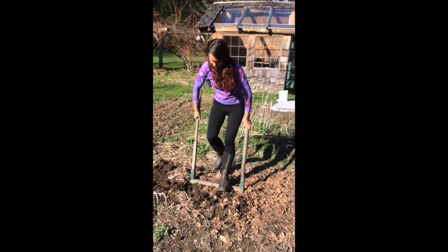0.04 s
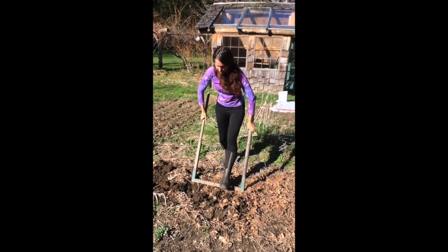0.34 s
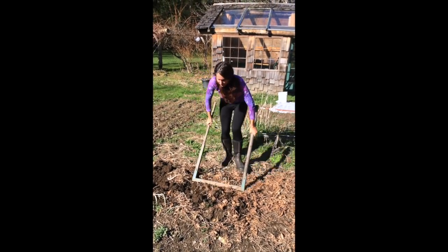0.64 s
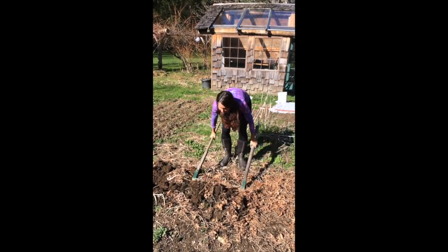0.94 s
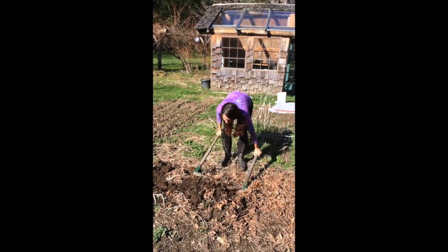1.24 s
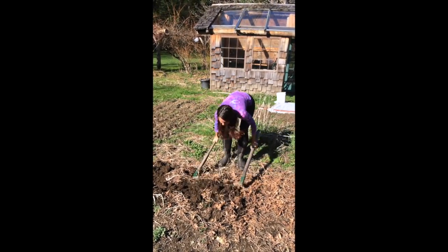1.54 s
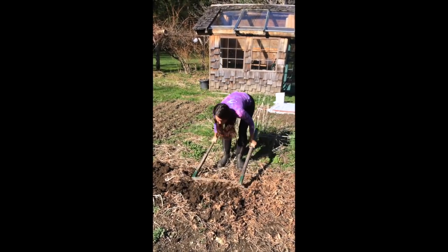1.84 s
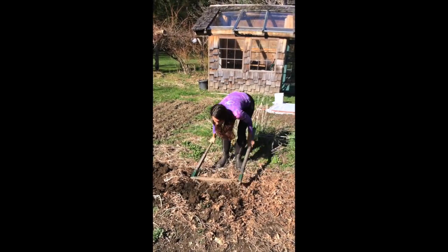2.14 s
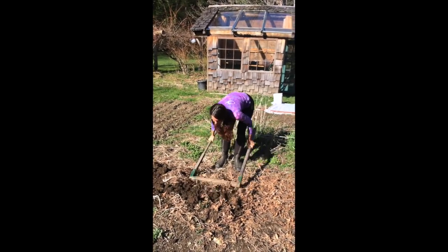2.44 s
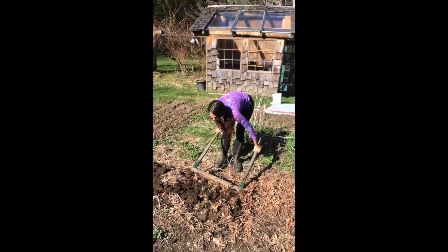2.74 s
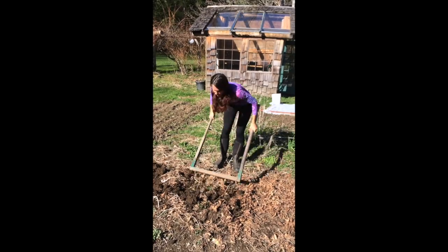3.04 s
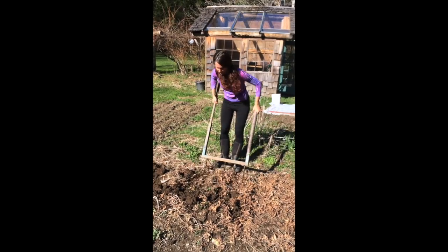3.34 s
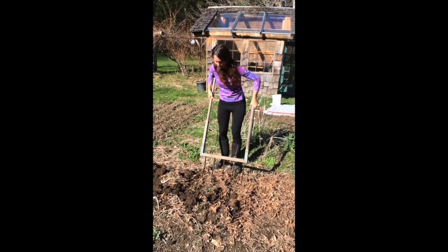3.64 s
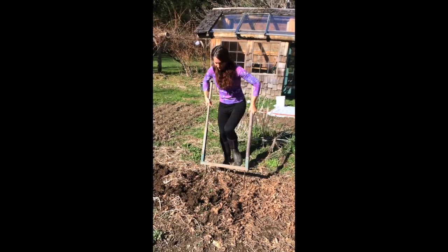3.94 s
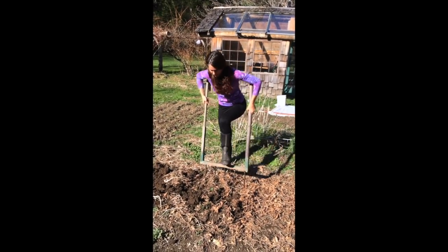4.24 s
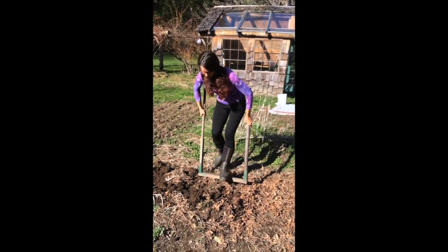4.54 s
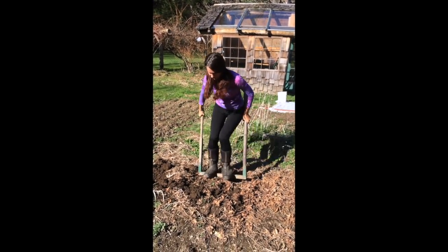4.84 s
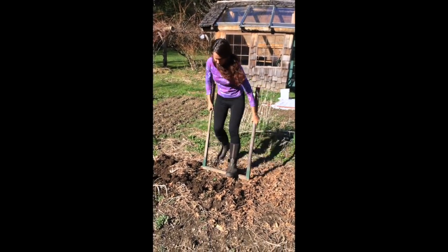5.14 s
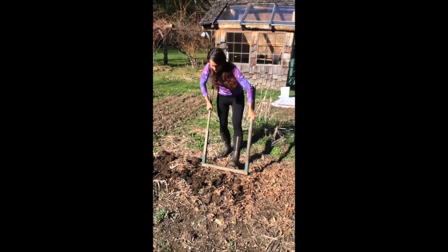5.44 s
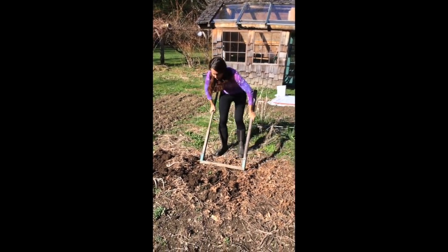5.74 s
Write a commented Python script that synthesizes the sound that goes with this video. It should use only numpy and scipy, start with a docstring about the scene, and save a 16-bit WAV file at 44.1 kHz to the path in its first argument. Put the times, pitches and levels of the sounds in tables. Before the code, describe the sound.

A garden fork levers through soil and dry straw with crunching, dull thuds and wooden knocks, then boots stamp it into gritty ground.

```python
"""A broadfork (a wide digging fork with two handles) loosens soil under straw, outdoors.
First it is levered through the ground: clods break with dull thuds, dry straw crunches and snaps,
and the wooden handles knock in their sockets. Near 3 s the frame clacks and the tines (steel prongs)
slide out with a faint squeak. The fork is set down, and from 4.4 s boots land on the crossbar and
the tines scrape and ring as they sink into gritty ground. Last, the straw crunches again."""
import sys
import numpy as np
from scipy import signal
from scipy.fft import rfft, irfft
from scipy.io import wavfile
from scipy.ndimage import uniform_filter1d

SR = 44100
rng = np.random.default_rng(int(sys.argv[2]) if len(sys.argv) > 2 else 0)


def output_pcm(signal):
    """Save a mono or channel-first signal as 16-bit PCM at the path in sys.argv[1].

    Samples are clipped to [-1, 1] before scaling.
    """
    pcm = np.clip(np.atleast_2d(signal).T, -1, 1) * 32767
    wavfile.write(sys.argv[1], SR, np.round(pcm).astype(np.int16))


N = 260190
TIME = np.arange(N) / SR

# crumbs that keep trickling, most while the fork is levered: t/s, level/dB
TRICKLE_LEVELS = [(0, -53.5), (0.15, -64.5), (0.3, -59.5), (0.42, -53), (1.0, -53), (1.17, -59.5),
                  (1.6, -52.5), (2.86, -52.5), (2.98, -69), (3.6, -59.5), (4.25, -76), (4.65, -63),
                  (4.8, -69.5), (5.08, -57), (5.3, -61), (5.9, -49)]
# the tone of thin straw: f/Hz, level/dB
STRAW_SPECTRUM = [(700, -38), (1600, -20.5), (2200, -11), (3300, -6.5), (5000, -3.5), (7000, 1), (12000, 1),
                  (16000, 2)]
# clods and roots giving way underground: t/s, level/dB, f/Hz
CLOD_BREAKS = [(0.088, -29.5, 121), (0.215, -30.5, 95), (0.38, -23.5, 250), (0.393, -16, 170),
               (0.469, -25.5, 129), (0.583, -24.5, 100), (0.714, -31, 114), (0.817, -22.5, 126),
               (1.221, -33.5, 108), (1.346, -27.5, 184), (1.36, -24.5, 150), (1.394, -12.5, 148),
               (1.411, -22.5, 163), (1.513, -23.5, 157), (1.548, -25.5, 102), (1.66, -9, 196),
               (1.861, -15, 208), (2.021, -22, 118), (2.053, -13, 192), (2.08, -11, 158),
               (2.091, -12.5, 157), (2.494, -21, 108), (3.607, -42, 106), (3.845, -36.5, 101),
               (4.047, -37, 89), (5.374, -24, 187)]


def amp(db):
    """Turns decibels into a factor to multiply a sound by."""
    return 10 ** (np.asarray(db) / 20)


def unit(x):
    """Scales a signal to an average size (rms) of 1."""
    return x / np.sqrt(np.mean(x ** 2) + 1e-20)


def add(mix, s, sound):
    """Mixes a sound in at s seconds."""
    part = mix[max(round(s * SR), 0):][:len(sound)]
    part += sound[:len(part)]


def colour(x, spectrum):
    """Shapes the tone of a sound by rows of f/Hz, level/dB; the result has rms 1."""
    hz, db = np.transpose(spectrum)
    f = np.fft.rfftfreq(len(x), 1 / SR)
    gain = amp(np.interp(np.log(f + 1), np.log(hz), db))
    return unit(irfft(rfft(x) * gain, len(x)))


def wander(first, second):
    """A slow random wobble: noise smoothed twice, over these numbers of samples."""
    return unit(uniform_filter1d(uniform_filter1d(rng.standard_normal(N), first), second))


def swell_db(s, length, rise_db_per_s, fall_db_per_s):
    """A level that rises to 0 dB at time s, stays for length seconds, then falls."""
    return -rise_db_per_s * np.maximum(s - TIME, 0) - fall_db_per_s * np.maximum(TIME - s - length, 0)


def resonances(modes, f, reach=0.81):
    """How a body answers at frequencies f; each mode (natural tone) sounds only near its own pitch."""
    return sum(amp(db) / (1 + 1j * (f - hz ** 2 / f) / width) / (1 + 1j * (f / hz - hz / f) / reach)
               for hz, width, db in modes)


def fractures(per_s, spread_db):
    """Tiny breaks: clicks at random times and of random sizes."""
    size = amp(spread_db * np.minimum(rng.exponential(1, N), 4))
    return size * rng.choice([-1, 1], N) * (rng.random(N) < per_s / SR)


def grains(per_s, spread_db, cycles, count=24):
    """Each tiny break makes one small fibre ring briefly."""
    t, out = np.arange(256) / SR, np.zeros(N)
    for hz in np.linspace(900, 15500, count):
        fibre = np.sin(2 * np.pi * hz * t) * np.exp(-t * hz / cycles)
        out += signal.oaconvolve(fractures(per_s / count, spread_db), unit(fibre))[:N]
    return unit(out)


def patchy(x, depth_db):
    """Fibres of different sizes break in turn, so small patches of time and pitch stand out."""
    spectra = signal.stft(x, nperseg=256, noverlap=192)[2]
    patches = rng.standard_normal(spectra.shape)
    for axis, size in ((0, 3), (0, 3), (1, 6), (1, 6)):  # smooth along pitch, then time
        patches = uniform_filter1d(patches, size, axis)
    spectra *= amp(depth_db * unit(patches))
    return unit(signal.istft(spectra, nperseg=256, noverlap=192)[1][:N])


def pressure(rest_db=-69.5, press_s=0.062, relax_s=0.075):
    """Strength of the fine and the coarse grains: every crush adds its power to the trickle."""
    # wads crushed by boot or fork: t/s, hold/s, level/dB, coarse grains compared with fine/dB
    crushes = [(0.376, 0.041, -35.5, -13), (0.53, 0.1, -37.5, -37), (0.836, 0.038, -25.5, -18),
               (0.955, 0.032, -43.5, -30), (1.288, .04, -38, -16.5), (1.495, 0.045, -28.5, -12),
               (1.723, 0.021, -41, -6), (1.894, 0.0088, -48.5, 6.5), (2.048, 0.0093, -43.5, 3.5),
               (2.19, 0.041, -46.5, 4), (2.35, 0.0064, -46.5, -1), (2.399, 0.0035, -40, 2.5),
               (2.538, 0.01, -45.5, 3.5), (2.745, 0.028, -35, -6), (3.26, 0.15, -27, -32),
               (3.383, 0.068, -23.5, -25), (3.86, 0.043, -46.5, -7.5), (3.95, 0.0083, -53.5, 4),
               (4.876, .02, -46, 0.5), (5.12, 0.01, -47.5, 2), (5.366, 0.0045, -27, -12),
               (5.564, 0.021, -20.5, -16), (5.592, 0.015, -21.5, -7.5), (5.637, .007, -25, -9.5),
               (5.769, 0.0092, -34.5, -7), (5.835, 0.022, -37, -12.5)]
    fine = amp(np.interp(TIME, *np.transpose(TRICKLE_LEVELS))) ** 2
    coarse = fine * amp(-0.5) ** 2
    for s, hold, db, coarse_db in crushes:
        depth_db = max(db - rest_db, 10)
        crush_db = db + swell_db(s, hold, depth_db / press_s, depth_db / relax_s)
        power = amp(np.maximum(crush_db, -200)) ** 2
        fine += power
        coarse += power * amp(coarse_db) ** 2
    return np.sqrt(fine), np.sqrt(coarse)


def crunch(clump_db=1.2):
    """Fine straw and coarse crumbs break in clumps of tiny clicks over a soft rustle."""
    fine, coarse = pressure()
    clumps = amp(clump_db * wander(160, 90))
    straw = grains(per_s=5000, spread_db=2.5, cycles=0.96)
    straw += 0.87 * unit(fractures(per_s=3200, spread_db=1.5))
    straw = patchy(straw + rng.standard_normal(N), depth_db=2.6)
    crumbs = grains(per_s=6000, spread_db=3.5, cycles=0.28)
    crumbs = patchy(crumbs + rng.standard_normal(N), depth_db=4.5)
    straw += 0.33 * grains(per_s=130, spread_db=3, cycles=7)  # stiffer fibres, each with its own pitch
    # the tone of crumbs and stalks: f/Hz, level/dB
    crumb_spectrum = [(200, -25), (500, -2), (1100, 1.5), (1900, 5.5), (3200, 2.5), (5000, 4.5), (9000, 3),
                      (16000, -7.5)]
    return clumps * (fine * colour(straw, STRAW_SPECTRUM) + coarse * colour(crumbs, crumb_spectrum))


def crackles(level_db=-4):
    """Among the trickling crumbs, single dry fibres tick."""
    ticks = grains(per_s=45, spread_db=2.8, cycles=9) + unit(fractures(per_s=18, spread_db=2.8))
    trickle_db = np.interp(TIME, *np.transpose(TRICKLE_LEVELS))
    return amp(level_db + trickle_db) * colour(ticks, STRAW_SPECTRUM)


def soil(rise_cycles=0.32, fall_cycles=0.64):
    """Each clod gives way with a thud of one or two cycles; loose earth rumbles around it."""
    out, t = np.zeros(N), np.arange(-3000, 3000) / SR
    for s, db, hz in CLOD_BREAKS:
        cycles = t * hz
        swell = np.exp(-np.abs(cycles / np.where(t < 0, rise_cycles, fall_cycles)) ** 1.31)
        wave = np.sin(2 * np.pi * cycles + rng.uniform(-0.66, 1.0))
        add(out, s + t[0], amp(db) * swell * wave)
    low_cut = signal.butter(2, 50, "high", fs=SR, output="sos")
    return signal.sosfilt(low_cut, out + loose_earth())


def loose_earth(lurch_db=4, slump_db=-15, slump_db_per_s=600):
    """Earth rumbles in lurches through each pull, and slumps briefly around each breaking clod."""
    # pulls on the handles that lift the earth: t/s, length/s, level/dB
    heaves = [(0.465, 0.45, -42), (1.293, 0.4, -41.5), (1.982, 0.078, -36.5), (2.255, 0.54, -55)]
    rumble = colour(rng.standard_normal(N),
                    [(30, -34), (75, -1), (130, -6.5), (200, -14), (320, -32.5), (700, -35.5), (2000, -82)])
    lurch = lurch_db * wander(1000, 700)
    pulls = [db + lurch + swell_db(s, length, rise_db_per_s=300, fall_db_per_s=218)
             for s, length, db in heaves]
    slumps = [db + slump_db - slump_db_per_s * np.abs(TIME - s) for s, db, _ in CLOD_BREAKS]
    return amp(np.max(pulls + slumps, axis=0)) * rumble


def sharp_cracks(tail_db=-22, tail_s=0.021, skirt_db=-22, rise_s=0.00096, ripple_db=4, size=4096):
    """Short bursts of noise: stalks snapping, grit striking the steel, the frame's tick as it clacks."""
    # short sharp cracks: t/s, level/dB, f/Hz, width/octaves, decay/s
    cracks = [(0.382, -21.5, 9050, 0.59, 0.0063), (.405, -19, 10200, 0.39, 0.0029),
              (0.585, -18, 8000, 0.74, 0.0031), (0.784, -30, 5920, 0.044, 0.008),
              (0.819, -19.5, 11100, 0.35, .0015), (0.9304, -15.5, 6050, 0.32, 0.0029),
              (0.929, -26.5, 1620, 0.44, 0.0035), (1.132, -34.5, 9450, 0.91, .0015),
              (1.494, -24, 3100, 1.34, 0.0067), (2.177, -31, 4530, 0.048, 0.0039),
              (2.225, -33.5, 5300, 0.15, 0.005), (2.346, -32, 8000, 3.5, 0.0064),
              (2.526, -27, 4100, 0.21, 0.0024), (2.735, -18.5, 11340, 0.067, 0.0025),
              (2.9084, -19, 6070, 0.48, 0.0029), (3.264, -21.5, 9300, 0.46, 0.014),
              (3.397, -17, 10100, 1.33, 0.0017), (3.541, -38.5, 11500, 0.32, 0.0015),
              (4.435, -19.5, 2930, 0.34, 0.0046), (4.892, -30, 8540, 0.37, 0.0036),
              (4.952, -42.5, 8200, 0.3, 0.0035), (5.365, -16, 8700, 0.62, 0.0059),
              (5.14, -26, 1900, 0.19, 0.01), (5.692, -17.5, 6600, 1.13, 0.0071),
              (5.761, -26.5, 11200, 0.78, 0.019), (5.831, -19.5, 10000, 0.59, 0.0051)]
    out, t = np.zeros(N), (np.arange(size) - size // 8) / SR
    f, after = np.fft.rfftfreq(size, 1 / SR) + 1, np.maximum(t, 0)
    for s, db, hz, octaves, decay in cracks:
        shape = np.exp(-0.5 * (np.log2(f / hz) / octaves) ** 2) + amp(skirt_db) / (f / hz + hz / f)
        ripple = unit(uniform_filter1d(rng.standard_normal(len(f)), size=50))  # a few narrow peaks
        shape *= amp(ripple_db * ripple)
        noise = unit(irfft(shape * np.exp(2j * np.pi * rng.random(len(f)))))
        rise = np.exp(np.minimum(t, 0) / rise_s)
        fade = np.exp(-after / decay) + amp(tail_db) * np.exp(-after / tail_s)
        add(out, s + t[0], amp(db) * noise * rise * fade)
    return out


def blows(events, modes, contact_s, rattle, rattle_s, size=2000):
    """A blow and a short rattle make a body ring; a longer contact sounds duller."""
    out, t = np.zeros(N), np.arange(size) / SR
    f = np.fft.rfftfreq(8192, 1 / SR) + 1
    push = t * np.exp(-t / contact_s)
    for s, db, pitch in events:
        force = rattle * rng.standard_normal(size) * np.exp(-t / rattle_s)
        force[0] += 1  # the blow itself
        ring = irfft(resonances(np.array(modes) * [pitch, 1, 1], f))[:4096]
        sound = signal.fftconvolve(signal.fftconvolve(force, push), ring)
        add(out, s, amp(db) * sound / np.abs(sound).max())
    return out


def handle_knocks():
    """The wooden handles knock in their sockets."""
    # knocks: t/s, peak level/dB, pitch factor
    knocks = [(1.687, -19, 1), (1.789, -29.5, 0.93), (1.989, -25.5, 1.02), (2.034, -27.5, 0.99),
              (2.068, -28, 1), (2.347, -36, 1.07), (2.913, -23.5, 0.98)]
    # natural tones of a handle: f/Hz, width/Hz, level/dB
    handle_modes = [(595, 18, -15), (682, 42, -0.5), (765, 31.5, 6.5), (968, 30, -7)]
    return blows(knocks, handle_modes, contact_s=0.00016, rattle=0.037, rattle_s=0.003)


def frame_clacks():
    """The frame clacks sharply as it is shifted."""
    # clacks: t/s, peak level/dB, pitch factor
    clacks = [(2.902, -16.5, 1.09), (2.9075, -13, 0.99), (2.9115, -14, 0.99), (3.097, -38, 1.02),
              (5.141, -30.5, 1.02)]
    # natural tones of the frame: f/Hz, width/Hz, level/dB
    frame_modes = [(1270, 180, -32), (1500, 64, -12), (1741, 76, 3), (2163, 300, -7), (2740, 500, -9.5),
                   (3240, 150, -13.5)]
    return blows(clacks, frame_modes, contact_s=0.00003, rattle=0.1, rattle_s=0.005)


def squeak(start_s=3.05, length_s=0.045, level_db=-54.5, hz=1808, width_hz=18):
    """As the tines slide out of the ground, rubbing keeps one tone of the frame ringing."""
    response = resonances([(hz, width_hz, 0)], np.fft.rfftfreq(N, 1 / SR) + 1)
    tone = unit(irfft(rfft(rng.standard_normal(N)) * response, N))
    return amp(level_db + swell_db(start_s, length_s, rise_db_per_s=128, fall_db_per_s=900)) * tone


def tines(grit_db=-2, ring_db=-3, rasp_growth=0.082, full_thrust_db=-21, stall_db=10.5, pebble_s=0.0029):
    """Grit and pebbles ring the steel, which the soil quiets at once; harder thrusts rasp more."""
    # natural tones of the tines in soil: f/Hz, width/Hz, level/dB
    tine_modes = [(2580, 43, -36), (3306, 80, 3.5), (5960, 26, 10), (5980, 100, -1), (7380, 110, 1),
                  (7640, 252, -20), (9540, 43, 8), (10000, 130, 2.5), (11440, 86, 2.5), (13050, 190, -1)]
    # the tone of rasping grit: f/Hz, level/dB
    grit_spectrum = [(350, -12), (700, -5.5), (1200, -14), (2200, 8), (4100, -4), (4600, 6), (7300, 5.5),
                     (8500, -1), (9700, -2), (13700, -18), (15500, -22)]
    # strokes through the grit: t/s, length/s, level/dB, treble slope/(dB per octave)
    scrapes = [(3.065, 0.05, -53.5, -21), (3.878, 0.12, -50, -11), (4.415, 0.024, -37.5, -8),
               (4.443, 0.11, -21, 1.5), (4.813, 0.05, -51.5, -15), (5.103, 0.021, -45, -5)]
    # pebbles ticking against the tines: t/s, level/dB
    pebbles = [(3.162, -44), (3.83, -47), (3.844, -42), (3.853, -26.5), (3.874, -36), (3.884, -42),
               (3.907, -41), (4.864, -38)]
    out, f = np.zeros(N), np.fft.rfftfreq(N, 1 / SR) + 1
    catches = unit(fractures(per_s=22000, spread_db=-0.5))
    steel = unit(irfft(rfft(catches) * resonances(tine_modes, f), N))
    rasp = colour(patchy(catches, depth_db=2.5), grit_spectrum)
    for s, length, db, tilt_db in scrapes:
        stroke_db = swell_db(s, length, rise_db_per_s=1700, fall_db_per_s=754)
        stroke_db -= stall_db * np.clip((TIME - s) / length, 0, 1) ** 2  # the soil slows the stroke
        span = stroke_db > -40
        pressure_db = db + stroke_db[span]
        rasp_db = grit_db + rasp_growth * (pressure_db - full_thrust_db)
        rub = amp(ring_db) * steel[span] + amp(rasp_db) * rasp[span]
        out[span] += amp(pressure_db) * colour(rub, [(3000, 0), (12000, 2 * tilt_db)])
    tick_fade = np.exp(-np.arange(3000) / SR / pebble_s)
    for s, db in pebbles:
        add(out, s, amp(db) * tick_fade * steel[round(s * SR):][:len(tick_fade)])
    return out


def boot_steps():
    """Boots land on the crossbar with a soft, low thump."""
    # landings: t/s, peak level/dB, pitch factor
    steps = [(4.3895, -9, 1.005), (4.426, -23, 0.93), (4.801, -29.5, 1), (4.813, -11.5, 1.036),
             (4.824, -22.5, 0.63), (4.846, -24.5, 0.9)]
    # natural tones of the crossbar: f/Hz, width/Hz, level/dB
    crossbar_modes = [(234.4, 57, -2), (264.4, 18, -6.5), (538, 110, -4.5), (636, 51, -21)]
    return blows(steps, crossbar_modes, contact_s=0.0003, rattle=0.012, rattle_s=0.006)


def garden(x, echo_db=-21, fade_60db_s=0.13, size=20000):
    """Adds faint echoes from the ground, the shed and the trees."""
    t = np.arange(size) / SR
    echoes = rng.standard_normal(size) * (rng.random(size) < 0.08)
    echoes *= amp(-60 * t / fade_60db_s) * (t > 0.004)
    echoes = colour(echoes, [(200, 1.5), (800, 6.5), (1800, 2), (6000, -3), (16000, -15)]) / np.sqrt(size)
    return x + amp(echo_db) * signal.oaconvolve(x, echoes)[:N]


def scene():
    """Soil, straw and fork over the steady hush of the open air."""
    # the tone of the open air: f/Hz, level/dB
    air_spectrum = [(25, -39), (50, -29), (100, -5), (250, -2.5), (550, -2), (1000, -7), (2000, -15.5),
                    (8000, -24), (16000, -76)]
    fork = tines() + squeak() + handle_knocks() + frame_clacks() + boot_steps()
    air = amp(-58) * colour(rng.standard_normal(N), air_spectrum)
    digging = crunch() + crackles() + sharp_cracks() + soil() + fork
    return (garden(digging) + air)[None]


def record(dry, edge_hz=15450):
    """Cuts away the very highest treble."""
    low_pass = signal.firwin(255, edge_hz, window=("kaiser", 8), fs=SR)
    return signal.oaconvolve(dry, low_pass[None], "same")


dry = scene()
out = record(dry)
output_pcm(out)
```